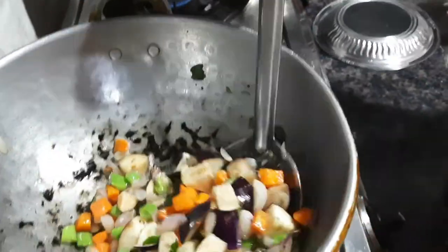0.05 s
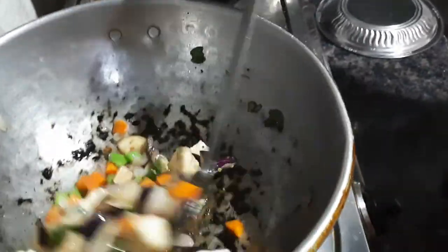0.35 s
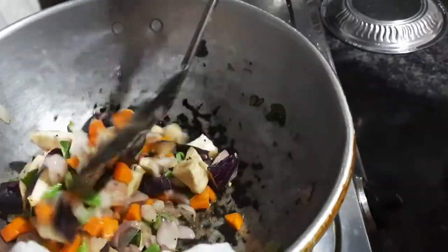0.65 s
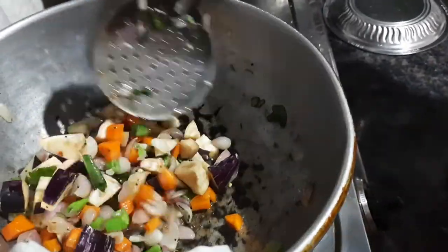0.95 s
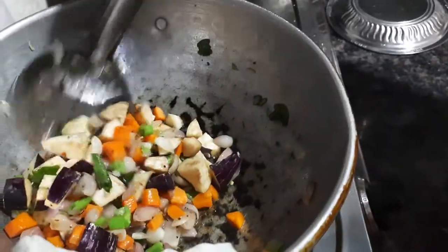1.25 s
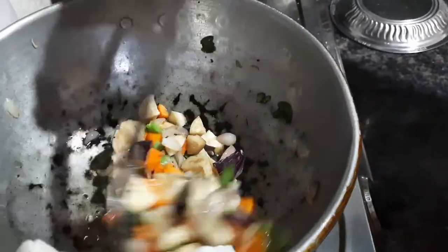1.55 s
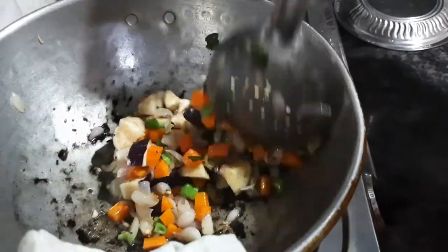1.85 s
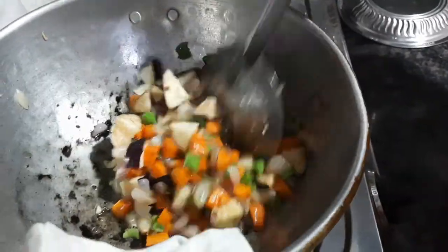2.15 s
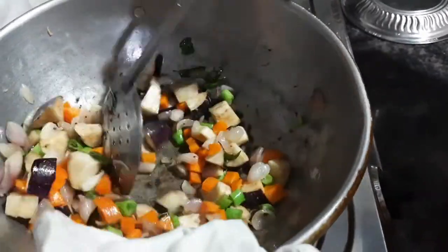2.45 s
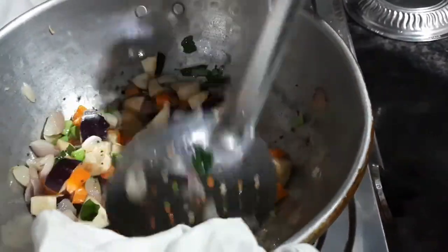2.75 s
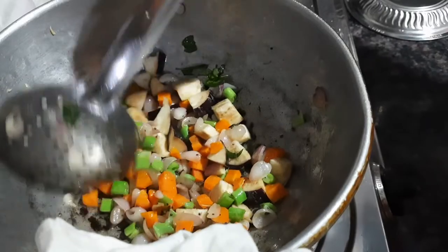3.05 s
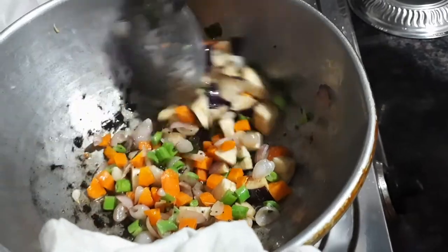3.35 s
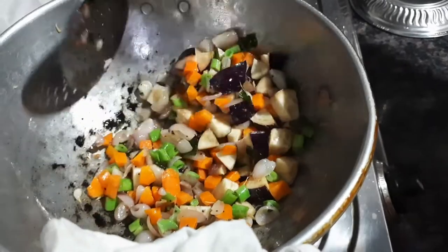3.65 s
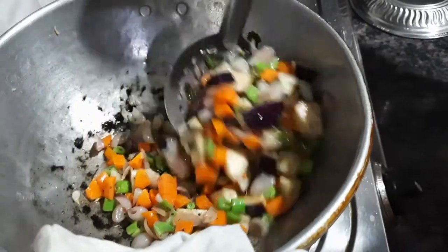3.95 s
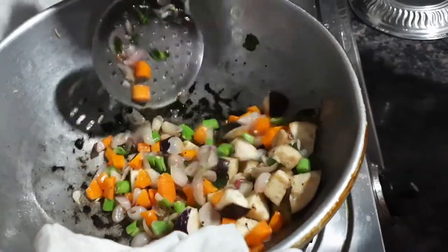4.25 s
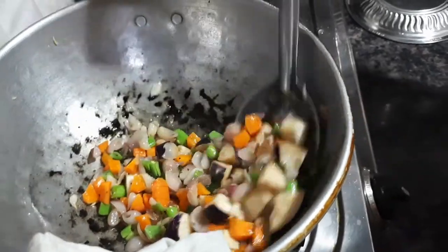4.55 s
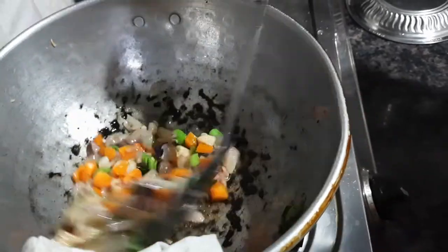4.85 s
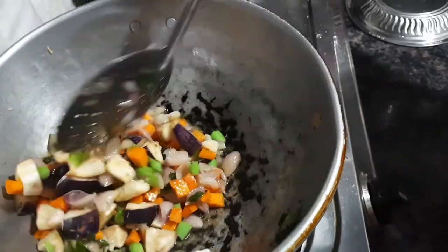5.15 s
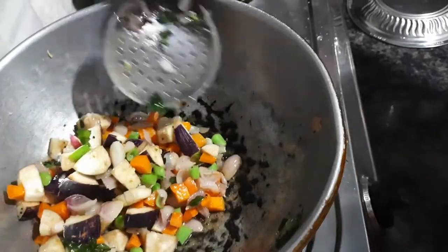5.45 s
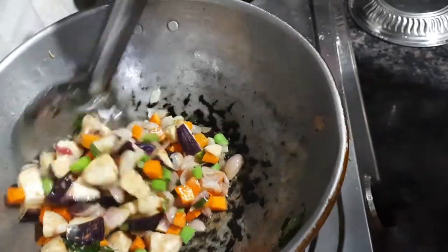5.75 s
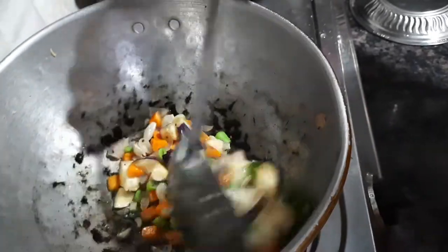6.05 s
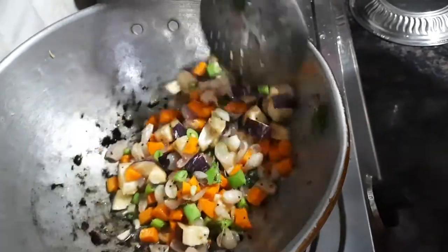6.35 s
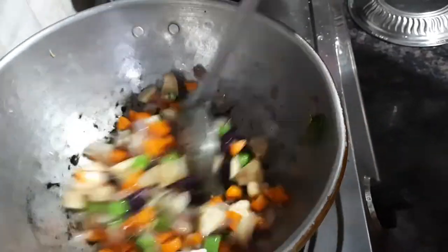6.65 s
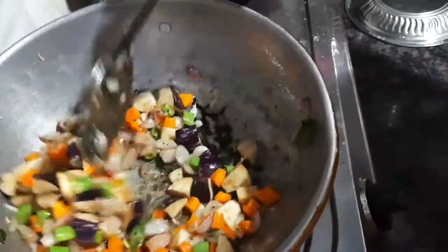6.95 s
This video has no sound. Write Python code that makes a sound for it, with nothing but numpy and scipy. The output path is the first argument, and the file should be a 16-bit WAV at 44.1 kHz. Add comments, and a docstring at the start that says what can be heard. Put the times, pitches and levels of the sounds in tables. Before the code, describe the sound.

A metal ladle knocks and scrapes in a metal pan, turning chopped vegetables that land with soft wet pats over a faint sizzle.

```python
"""Stirring vegetables in a pan

A small kitchen, one microphone close to a wide metal pan. A slotted metal ladle knocks on the wall, then
scrapes and judders along the bottom; the food damps the pan's ring. Turned pieces land with soft wet
pats. The oil sizzles faintly, louder when fresh faces touch the metal, and the stove murmurs behind."""
import sys
import numpy as np
from scipy import signal
from scipy.fft import rfft, irfft
from scipy.io import wavfile
from scipy.ndimage import uniform_filter1d

SR = 44100
rng = np.random.default_rng(int(sys.argv[2]) if len(sys.argv) > 2 else 0)


def put_to_file(sound):
    """Save the sound as 16-bit audio at rate SR, in the file named by the first command-line argument."""
    columns = np.atleast_2d(sound).T  # one column per channel
    safe = np.clip(columns, -1, 1)
    whole_steps = np.round(safe * 32767)
    wavfile.write(sys.argv[1], SR, whole_steps.astype(np.int16))


N = 313551

# The ladle strikes the pan. Each row: start in seconds, relative levels of bottom, wall, rim and clink
# in dB, clink tilt in dB per octave, decay of the crack in seconds.
LADLE_KNOCKS = [(0.114, -51.5, -63.5, -75.5, -70, -14, 0.0122), (0.2, -40, -54, -76.5, -60.5, 1, 0.0095),
                (1.127, -37, -29, -27.5, -26, 3.5, 0.0099), (1.498, -43, -57.5, -52, -51, 0.5, 0.007),
                (1.631, -46.5, -39, -48, -47.5, -8.5, 0.0085),
                (1.689, -37, -39.5, -39, -66.5, -14.5, 0.008), (2.165, -25, -30.5, -58.5, -44.5, 0, 0.0092),
                (2.817, -39, -38.5, -46, -47, 1.5, 0.063), (3.069, -59.5, -35.5, -46.5, -53.5, 4, 0.0082),
                (3.207, -49, -44.5, -37.5, -49, 4.5, 0.0096), (3.675, -35, -33.5, -38.5, -34, 2, 0.0151),
                (3.707, -32, -33, -40.5, -56, -7, 0.0077), (4.343, -31.5, -27.5, -40, -40.5, -3, 0.0304),
                (4.58, -34.5, -38, -73, -48.5, -4, 0.0081), (4.635, -35, -64.5, -72, -58, -4, 0.0074),
                (5.57, -69, -34.5, -36.5, -29, 7.5, 0.0072), (5.578, -37.5, -50, -56, -35, 9.5, 0.0038),
                (5.67, -73.5, -42, -39, -45.5, 2.5, 0.016), (6.080, -34.5, -28, -32.5, -65.5, -10.5, 0.008),
                (6.535, -25.5, -21, -26, -35, 10, 0.0045)]
# The ladle drags over the pan. Each row: start, length and bite time in seconds, base easing rate in
# dB per second, relative levels of bottom, wall, rim and wet squelch in dB.
LADLE_STROKES = [(0.0, 0.2136, 0.00133, 27, -32.5, -49.5, -59.5, -57.5),
                 (1.142, 0.0786, 0.0039, 72.5, -31.5, -32, -33.5, -65.5),
                 (1.487, 0.0473, 0.0111, 54.5, -34, -32.5, -45.5, -52),
                 (1.615, 0.1319, 0.0143, 10, -42.5, -34.5, -37.5, -52.5),
                 (2.183, 0.1554, 0.0068, 52.5, -27, -30.5, -48, -44),
                 (2.937, 0.0388, 0.0122, 40.5, -53, -41.5, -42.5, -49),
                 (3.034, 0.167, 0.036, 29, -44, -30.5, -37.5, -43.5),
                 (3.211, 0.127, 0.0061, 51.5, -51, -38, -44, -55),
                 (3.686, 0.1543, 0.0028, 28.5, -30, -37.5, -46.5, -46.5),
                 (4.349, 0.312, 0.0031, 40, -36.5, -42.5, -54.5, -49),
                 (4.573, 0.0895, 0.0112, 30, -31.5, -39.5, -65.5, -53),
                 (4.714, 0.0643, 0.0095, 44, -34, -44, -63, -54),
                 (5.584, 0.1606, 0.0039, 33.5, -38, -45.5, -41, -48),
                 (5.82, 0.191, 0.146, 10, -36.5, -42, -48, -47),
                 (6.016, 0.1474, 0.0337, 55.5, -29, -26.5, -28.5, -40.5),
                 (6.559, 0.1613, 0.0052, 58, -28, -24, -40, -55.5),
                 (6.756, 0.0486, 0.0066, 20.5, -39, -37.5, -54.5, -64)]
# A stroke fades at bottom, wall and rim. Each row: factor on the easing, release in dB per second.
REGISTER_FADES = [(0.8, 232), (1.3, 415), (1.4, 363.5)]
SQUELCH_EASING, SQUELCH_RELEASE_DB_PER_S = 0.82, 152
# The edge sticks and slips. Each row: start and length in seconds, first and last Hz, level in dB.
EDGE_GROANS = [(2.302, 0.0673, 388.1, 383.5, -39.5), (2.788, 0.0474, 244.6, 238.5, -46),
               (3.08, 0.085, 519.1, 540.6, -37.5), (3.08, 0.051, 832, 813, -37.5),
               (3.105, 0.048, 1139, 1198, -41), (3.138, 0.0547, 723, 786, -37),
               (3.185, 0.039, 818.3, 919, -36.5), (3.281, 0.0764, 361.7, 380.5, -43),
               (3.757, 0.079, 2762, 2825, -48), (3.879, 0.0261, 371.5, 366, -44),
               (4.738, 0.1416, 171.8, 167.5, -37), (5.95, 0.0168, 336.5, 360, -40.5),
               (6.585, 0.094, 101.6, 107.8, -42), (6.775, 0.049, 577, 539.5, -38.5)]
# Brief bright hisses. Each row: start and length in seconds, relative level in dB.
BRIGHT_HISSES = [(1.106, 0.0308, -36), (2.2, 0.0356, -49), (3.662, 0.0117, -42), (4.334, 0.0125, -40.5),
                 (5.543, 0.021, -47.5), (5.562, 0.0102, -31), (5.608, 0.0604, -45), (6.522, 0.0186, -37)]
# Vegetables land. Each row: start and length in seconds, relative levels of thud and patter in dB.
FOOD_LANDINGS = [(0.637, 0.0269, -49.5, -54.5), (0.715, 0.044, -58, -62), (0.849, 0.0163, -42.5, -56.5),
                 (1.312, 0.0302, -52.5, -76), (1.413, 0.0125, -55, -64.5), (2.001, 0.031, -57, -68),
                 (2.03, 0.017, -62, -60.5), (2.79, 0.0108, -44.5, -57), (2.956, 0.0174, -51.5, -56.5),
                 (3.441, 0.012, -55.5, -66), (3.552, 0.0384, -60.5, -67), (4.014, 0.0069, -43.5, -50.5),
                 (4.093, 0.0835, -55.5, -51.5), (4.249, 0.0254, -56, -55), (5.11, 0.063, -53, -57),
                 (5.264, 0.0258, -51, -48.5), (5.459, 0.023, -57, -55.5), (5.916, 0.018, -43, -48),
                 (5.966, 0.0071, -51, -45), (6.262, 0.061, -60, -47), (6.462, 0.078, -54.5, -47),
                 (6.994, 0.0266, -53.5, -44), (7.061, 0.06, -58.5, -50.5)]
# Juice spits on hot metal. Each row: start and length in seconds, level in dB.
JUICE_SPURTS = [(0.133, 0.0097, -53.5), (.43, 0.0098, -53), (2.52, 0.0205, -57), (2.594, 0.016, -56),
                (2.645, 0.015, -56), (2.87, 0.0367, -51), (2.92, 0.0104, -50.5), (4.297, 0.036, -54),
                (5.005, 0.0264, -53.5), (5.992, 0.0348, -49.5), (6.342, 0.025, -49.5)]
# How hard the food fries. Each row: time in seconds, relative level in dB.
FRYING_VIGOUR = [(0, -73.5), (0.55, -70.5), (1.05, -77.5), (1.2, -70.5), (1.4, -75), (1.65, -69),
                 (1.92, -79.5), (2.12, -73), (2.25, -67), (2.75, -73), (3.05, -66), (3.6, -77.5),
                 (3.8, -73), (5.15, -69), (5.43, -72), (5.65, -70), (6.3, -67.5), (6.78, -58),
                 (6.95, -74.5), (7.02, -62), (7.11, -61.5)]

# Modes of the pan, and the bright ones of steel on pan. Each row: frequency in Hz, relative level in dB,
# seconds to fall 60 dB before damping by food or grip.
PAN_MODES = [(48.6, -18.5, 0.54), (109.08, -20, 1), (167.5, -3, 0.667), (236.2, 4.5, 0.125),
             (309.02, 3.5, 0.2625), (335.7, -3, 0.219), (389.4, 5, 0.136), (447.05, -4.5, 0.369),
             (474.3, -4, 0.322), (538, -1.5, 0.243), (562.7, 4, 0.097), (630.8, 2, 0.1383),
             (686.45, 1.5, 0.193), (737.7, -9.5, 0.316), (819.6, -11, 0.432), (840.8, -11, 0.298),
             (876.8, -8.5, 0.189), (938.4, 5, 0.0437), (1052.7, -3, 0.127), (1138.3, 3.5, 0.0424),
             (1195.2, -5, 0.145), (1270.8, -4.5, 0.0343), (1316, -12, 0.312), (1386, -27, 0.58),
             (1428, -5.5, 0.083), (1699.8, -9.5, 0.173), (1640.8, -26.5, 0.096)]
STEEL_MODES = [(1680, -35, .18), (1740, -34, .14), (2107, 0, 0.077), (2242, -7.5, 0.28),
               (2791.4, 11.5, 0.111), (3010, 2.5, 0.175), (3574, -6, 0.102), (3690, -2, 0.125),
               (4048, 4, 0.096), (5040, -7.5, 0.08), (5670, -30.5, .07), (7070, -16, 0.076),
               (8350, -51, 0.07)]
# The pan's registers: bottom, wall, rim. Each row: lower and upper edge in Hz.
REGISTER_EDGES = [(30, 430), (430, 950), (950, 1700)]

# The tone colour of each noise. Each row: frequency in Hz, relative level in dB.
CLINK_SPECTRUM = [(940, -3), (1600, 0.5), (2090, -2), (2340, 1), (2700, -14), (2970, -3.5), (5100, -13),
                  (5350, -15.5), (6230, -16.5), (6850, -17), (8280, -20), (9020, -34.5), (12600, -42.5),
                  (15500, -50.5)]   # steel on metal
GRIT_SPECTRUM = [(600, 5), (1400, -18), (1900, 1.5), (2500, -7.5), (3800, -4.5), (5000, -21), (8000, -26.5),
                 (9500, -29), (15000, -37.5)]     # rasp of rough metal
THUD_SPECTRUM = [(40, -14.5), (120, -13.5), (230, -11), (330, -3), (450, -14.5), (700, -22.5), (1100, -30),
                 (2000, -57.5)]     # soft pieces on the bottom
WET_SPECTRUM = [(530, -10), (900, -2), (1010, -14.5), (1170, 2), (1710, -3.5), (1880, 4.5), (2600, 1.5),
                (3710, 0), (5700, -7.5), (6200, -8.5), (8340, -11.5), (9860, -29.5), (11800, -16.5),
                (15500, -64)]       # juice and wet faces
OIL_SPECTRUM = [(530, -35), (900, -12), (1260, -6), (1470, -6), (1630, -8.5), (1820, -1), (2050, -27.5),
                (2860, -7.5), (3670, -8), (5440, -7), (8440, -6.5), (9860, -12.5), (11600, -10),
                (15500, -21.5)]       # fine sizzle
STOVE_SPECTRUM = [(15, -59.5), (25, -3), (196, -7.5), (233, -4.5), (432, -5), (460, -6), (603, -10.5),
                  (652, -3.5), (776, -22), (1100, -8.5), (1430, -26), (2420, -120)]   # low murmur


def knocks(pan_db=-0.5, damping=0.777, grip=0.594, thin_hz=200, travel_s=0.000627, bare_db=-29.5):
    """Nearest the microphone: a blow and its chatter ring the pan, the modes weighted anew each time."""
    out, t = np.zeros(N), np.arange(SR // 2) / SR
    impact = t == 0
    for start, *register_db, clink_db, tilt_db, crack_s in LADLE_KNOCKS:
        chatter = 0.055 * rng.standard_normal(len(t)) * np.exp(-t / 0.00334)
        force = impact + chatter
        for edges_hz, db in zip(REGISTER_EDGES, register_db):
            body = 0
            for hz, level, t60 in modes_in(edges_hz):
                # the light ladle hardly moves the slowest modes
                weight = from_db(level + 0.59 * rng.normal()) * hz / np.hypot(hz, thin_hz)
                arrival = delay(force, travel_s * rng.random())   # the flexing spreads over the pan
                body += weight * ring(arrival, hz, t60 * damping)
            add(out, start, from_db(db + pan_db) * unit_attack(band(body, edges_hz)))
        # steel on metal: a crowd of short high modes with a few that ring on
        decay = np.exp(-t / crack_s) + from_db(-14.5) * np.exp(-t / 0.0637)
        crack = rng.standard_normal(len(t)) * decay + 4.4 * impact
        crack = unit_attack(colour(crack, CLINK_SPECTRUM, tilt_db))
        tones = 0
        for hz, level, t60 in STEEL_MODES:
            weight = from_db(level + 6.5 * rng.normal() + tilt_db * np.log2(hz))
            tones += weight * ring(force, hz, t60 * grip)
        # only a hard, bare contact lets the steel ring; food mutes the soft ones
        bareness = min(1, from_db(clink_db - bare_db)) ** .5
        clink = crack + bareness * unit_attack(band(tones, [1400, 7500]))
        add(out, start, from_db(clink_db) * unit_attack(clink))
    return out


def scrapes(slips_per_s=450, wander_db=6.0, damping=0.607, body_db=-3.5):
    """Uneven slips drive the pan; the pressed ladle shortens the ring and shifts the mix of modes."""
    bottom, wall, rim, _ = stroke_gains()
    slips, pan = grains(slips_per_s, 2.5), 0
    for edges_hz, gain in zip(REGISTER_EDGES, (bottom, wall, rim)):
        body = 0
        for k, (hz, level, t60) in enumerate(modes_in(edges_hz)):
            force = slips * from_db(level + wander_db * drift(16))
            body += (-1) ** k * ring(force, hz, t60 * damping)
        pan += gain * steady(band(body, edges_hz), span_s=0.0455)
    # fine roughness of the metal rasps above the pan's modes
    roughness = slips + .5 * grains(4600, 2.67)
    grit = steady(colour(roughness, GRIT_SPECTRUM), span_s=0.056)
    grit_gain = from_db(-12) * rim + from_db(-23) * (bottom + wall)
    return from_db(body_db) * pan + grit_gain * grit


def pressure(levels_db, easing_factor, release_db_per_s):
    """Gain curve of the strokes: the edge bites, the arm eases off steadily, the ladle lifts."""
    out, t = np.zeros(N), np.arange(SR) / SR
    for (start, length, bite_s, easing, *_), db in zip(LADLE_STROKES, levels_db):
        eased_db = easing_factor * easing * np.minimum(t, length)
        lifted_db = release_db_per_s * np.maximum(t - length, 0)
        add(out, start, from_db(db - eased_db - lifted_db) * (1 - np.exp(-t / bite_s)))
    return out


def stroke_gains():
    """How hard the strokes drive bottom, wall and rim, and how much juice they press out."""
    *register_db, squelch_db = np.transpose(LADLE_STROKES)[4:]
    registers = [pressure(db, *fade) for db, fade in zip(register_db, REGISTER_FADES)]
    return *registers, pressure(squelch_db, SQUELCH_EASING, SQUELCH_RELEASE_DB_PER_S)


def groans(jitter=0.0361, overtone_db=-22.5, flutter_db=3.0, cycles=5):
    """Stick-slip locks to a rough pitch for a moment; its rate and grip change every few cycles."""
    out = np.zeros(N)
    for start, length, first_hz, last_hz, db in EDGE_GROANS:
        progress = np.linspace(0, 1, int(length * SR))
        glide_hz = first_hz + (last_hz - first_hz) * progress
        wobble = 1 + jitter * drift(first_hz / cycles)[:len(progress)]
        phase = 2 * np.pi * np.cumsum(glide_hz * wobble) / SR
        tone = sum(from_db(overtone_db * k) * np.sin((k + 1) * phase) for k in range(3))
        swell = np.sqrt(progress) * (1 - progress) ** 0.915
        grip = from_db(flutter_db * drift(first_hz / cycles)[:len(progress)])
        add(out, start, from_db(db) * unit_rms(tone * swell * grip))
    return out


def bright_hisses(gain_db=2.0):
    """Brief bright hisses, most swelling just before a clink."""
    swell = bursts(BRIGHT_HISSES, rise_s=0.00427, fall_s=0.0116)
    hiss = unit_rms(colour(grains(12000, 1.76), CLINK_SPECTRUM, tilt_db=1.5))
    return from_db(gain_db) * swell * hiss


def landings(thud_gain_db=2.0, patter_gain_db=1.5, rise_s=0.00087, fall_s=0.0205, drops_per_s=5000):
    """Soft pieces tumble for a moment: dull thuds on the bottom, with a wet patter on top."""
    starts, lengths, thud_db, wet_db = np.transpose(FOOD_LANDINGS)
    thud_gain = bursts(zip(starts, lengths, thud_db + thud_gain_db), rise_s, fall_s, sag_db_per_s=44.5)
    wet_gain = bursts(zip(starts, lengths, wet_db + patter_gain_db), rise_s, fall_s, sag_db_per_s=40.5)
    push = grains(900, 2.26)
    bottom_ring = unit_rms(band(ring(push, hz=321.7, t60=0.51), [150, 900]))
    thud = unit_rms(colour(push, THUD_SPECTRUM)) + .5 * bottom_ring
    patter = colour(grains(drops_per_s, 4.2), WET_SPECTRUM)
    return thud_gain * steady(thud, span_s=0.1) + wet_gain * steady(patter, span_s=0.1)


def frying(oil_db=7.5, wet_db=9.5, squelch_db=-7.5, flutter_db=3.0, fizz_db=-16.5, spit_db=-12.0):
    """Steam bursts finely in the oil and coarsely under wet pieces, more as the ladle presses them."""
    times, vigour_db = np.transpose(FRYING_VIGOUR)
    vigour = from_db(np.interp(np.arange(N) / SR, times, vigour_db))
    *_, squelch = stroke_gains()
    wet_gain = from_db(wet_db) * vigour + from_db(squelch_db) * squelch
    fizz = from_db(fizz_db) * bubbles()
    # the bursts come in clumps, so the hiss crackles
    clumps = unit_rms(grains(14000, 2.4) * from_db(1.2 * drift(120)))
    fine = unit_rms(colour(clumps + fizz, OIL_SPECTRUM))
    steam = unit_rms(grains(6000, 1.884))
    coarse = unit_rms(colour(steam + fizz, WET_SPECTRUM)) * from_db(flutter_db * drift(45))
    # juice spurts now and then, and a few larger bubbles spit above the rest
    juice = unit_rms(colour(grains(7000, 1.4), WET_SPECTRUM, tilt_db=4))
    spurts = bursts(JUICE_SPURTS, rise_s=0.00203, fall_s=0.0148) * juice
    spits = unit_rms(colour(grains(45, 1.7), WET_SPECTRUM, tilt_db=4))
    return from_db(oil_db) * vigour * fine + wet_gain * (coarse + from_db(spit_db) * spits) + spurts


def bubbles(per_s_per_pitch=55, cycles=38, pitch_count=36):
    """Tiny bubbles burst in the oil film, each with a brief pitch; unit rms."""
    pitches = np.geomspace(1500, 13000, pitch_count) * rng.uniform(.97, 1.03, pitch_count)
    return unit_rms(sum(hz * ring(grains(per_s_per_pitch, 4.7), hz, cycles / hz) for hz in pitches))


def kitchen(direct, t60=0.1125, room_db=-16.5, gap_s=0.001367):
    """Close walls send a short, dull tail to the microphone just after the direct sound."""
    t = np.arange(SR // 2) / SR
    tail = band(rng.standard_normal(len(t)), [120, 6000]) * from_db(-60 * t / t60) * (t > gap_s)
    return direct + from_db(room_db) * signal.fftconvolve(direct, tail / np.linalg.norm(tail))[:N]


def stove(level_db=-65, waver_db=0.29):
    """Behind it all, the stove's low, nearly even murmur."""
    gain = from_db(level_db + waver_db * drift(5.6))
    return gain * unit_rms(colour(rng.standard_normal(N), STOVE_SPECTRUM))


def modes_in(edges_hz):
    """The pan's modes in one register."""
    return [mode for mode in PAN_MODES if edges_hz[0] <= mode[0] < edges_hz[1]]


def ring(force, hz, t60):
    """One mode: a unit click sets a wave of height 1 ringing."""
    radius, angle = from_db(-60 / (t60 * SR)), 2 * np.pi * hz / SR
    return signal.lfilter([.5, 0, -.5], [1, -2 * radius * np.cos(angle), radius ** 2], force + 1e-18)


def grains(per_s, spread_db):
    """Random clicks of uneven strength."""
    strength = from_db(spread_db * np.minimum(rng.exponential(1, N), 4)) * rng.choice([-1, 1], N)
    return strength * (rng.random(N) < per_s / SR)


def drift(per_s):
    """A random wander with a spread near 1; it holds still after 1000 knots."""
    knots = rng.standard_normal(1000)
    return np.interp(np.arange(N) / SR * per_s, np.arange(len(knots)), knots)


def bursts(rows, rise_s, fall_s, sag_db_per_s=0):
    """Gains that swell, sag and die away. Each row: start and length in seconds, level in dB."""
    out, t = np.zeros(N), np.arange(SR // 3) / SR
    for start, length, db in rows:
        rise = 1 - np.exp(-t / rise_s)
        fall = np.exp(-np.maximum(t - length, 0) / fall_s)
        add(out, start, from_db(db - sag_db_per_s * t) * rise * fall)
    return out


def colour(x, spectrum, tilt_db=0, size=2048):
    """Causal (minimum-phase) filter with the given spectrum, tilted by dB per octave."""
    hz, db = np.transpose(spectrum)
    octave = np.log2(np.maximum(np.fft.rfftfreq(size, 1 / SR), 10))
    octaves_up = np.maximum(octave - np.log2(hz[0]), 0)
    response_db = np.interp(octave, np.log2(hz), db) + tilt_db * octaves_up
    cepstrum = irfft(np.log(from_db(response_db)))
    cepstrum[1:size // 2] *= 2
    cepstrum[size // 2 + 1:] = 0
    return signal.fftconvolve(x, irfft(np.exp(rfft(cepstrum))))[:len(x)]


def band(x, edges_hz):
    """Band-pass."""
    return signal.sosfilt(signal.butter(2, edges_hz, "band", fs=SR, output="sos"), x)


def steady(x, span_s):
    """Near unit rms over every stretch of span_s seconds."""
    power = np.maximum(uniform_filter1d(x * x, int(span_s * SR)), 0)
    return x / np.sqrt(power + 1e-3 * np.mean(x * x))


def unit_attack(x):
    """Unit rms over the first 20 ms."""
    return x / np.sqrt(np.mean(x[:SR // 50] ** 2))


def unit_rms(x):
    """Scale to unit rms."""
    return x / np.sqrt(np.mean(x ** 2) + 1e-20)


def from_db(db):
    """Decibels to gain."""
    return 10 ** (np.asarray(db) / 20)


def delay(x, seconds):
    """The same signal, later."""
    return np.pad(x, (int(seconds * SR), 0))[:len(x)]


def add(out, start_s, x):
    """Mix x in from start_s."""
    at = max(0, round(start_s * SR))
    out[at:at + len(x)] += x[:max(0, N - at)]


def scene():
    """From beside the stove, in mono: the pan and its contents up close, the murmur underneath."""
    murmur = stove()
    pan = knocks() + bright_hisses() + scrapes() + groans() + landings() + frying()
    return (kitchen(pan) + murmur)[None]


def record(dry, ceiling=0.28, low_cut_hz=32, top_cut_hz=15700):
    """The microphone chain rounds the highest peaks, then cuts the lowest rumble and the top."""
    rounded = ceiling * np.tanh(dry / ceiling)
    low_cut = signal.butter(2, low_cut_hz, "high", fs=SR, output="sos")
    top_cut = signal.ellip(10, .3, 80, top_cut_hz, fs=SR, output="sos")
    return signal.sosfilt(top_cut, signal.sosfilt(low_cut, rounded))


dry = scene()
out = record(dry)
put_to_file(out)
```